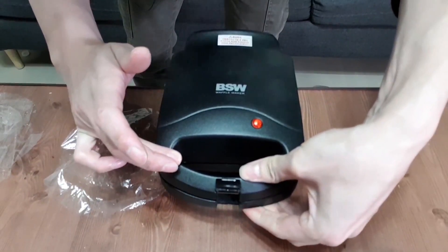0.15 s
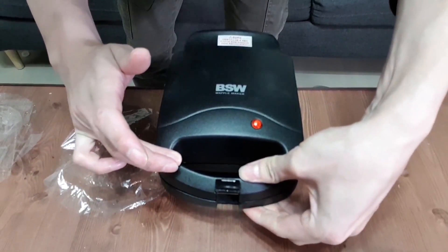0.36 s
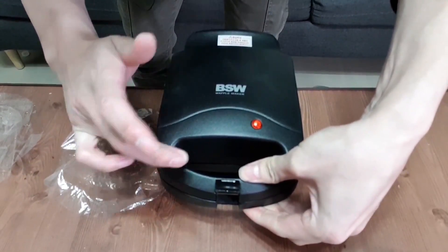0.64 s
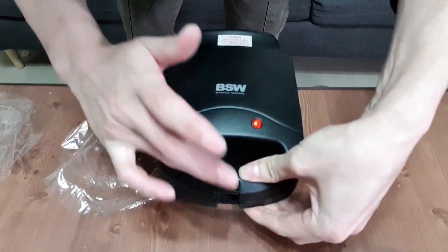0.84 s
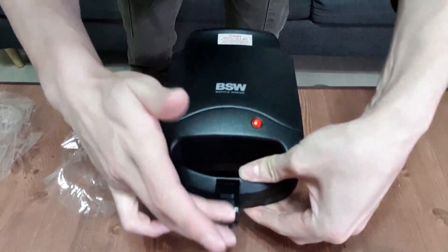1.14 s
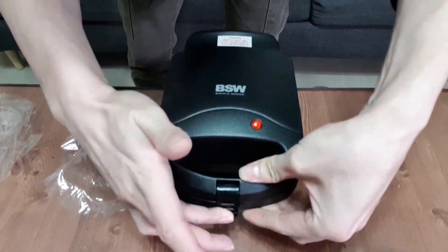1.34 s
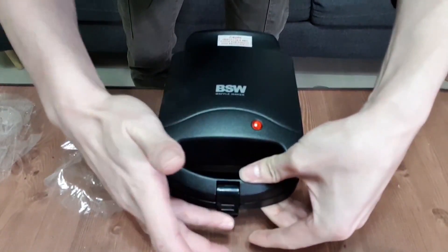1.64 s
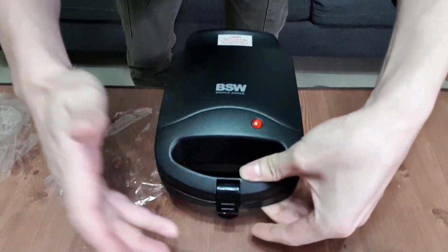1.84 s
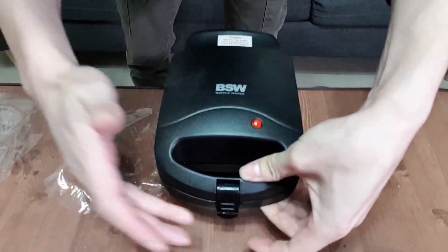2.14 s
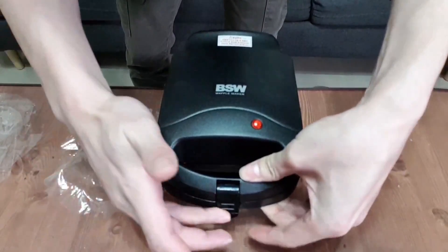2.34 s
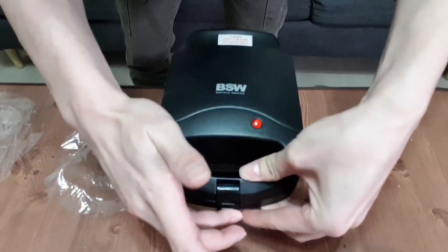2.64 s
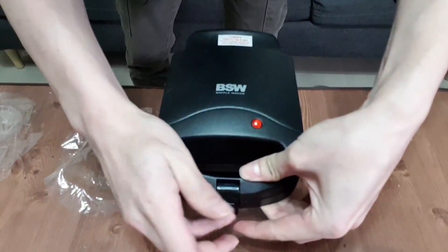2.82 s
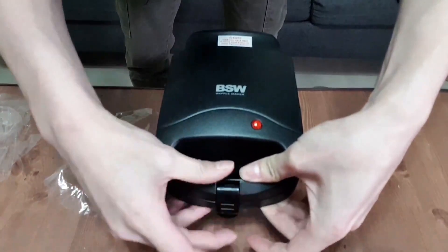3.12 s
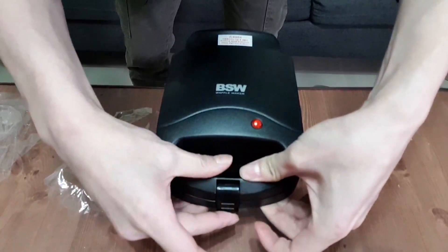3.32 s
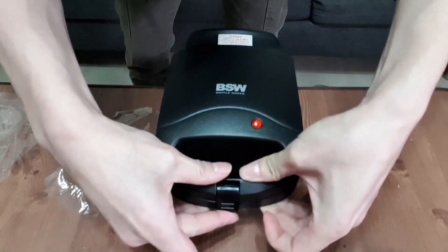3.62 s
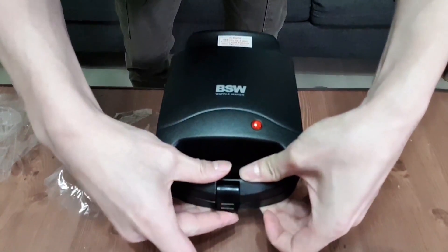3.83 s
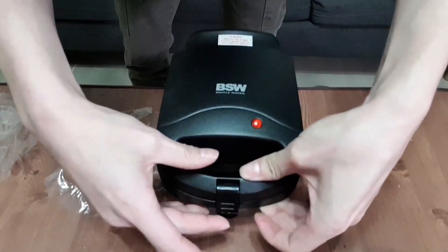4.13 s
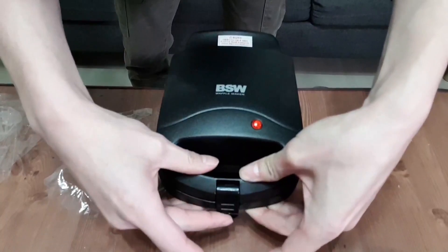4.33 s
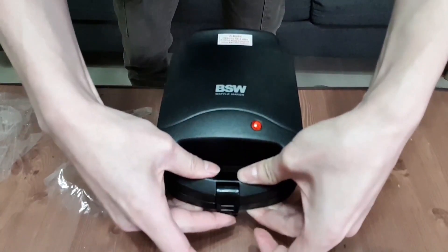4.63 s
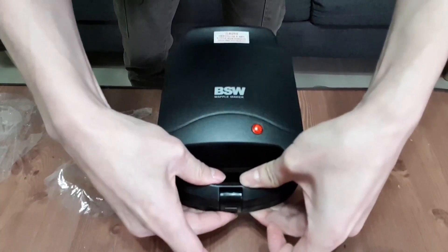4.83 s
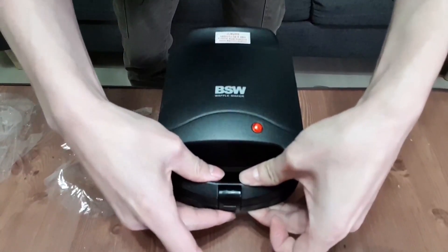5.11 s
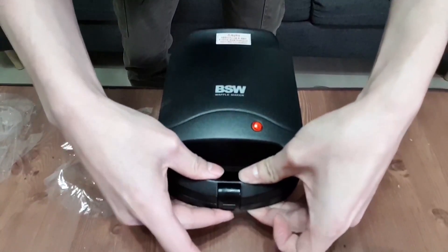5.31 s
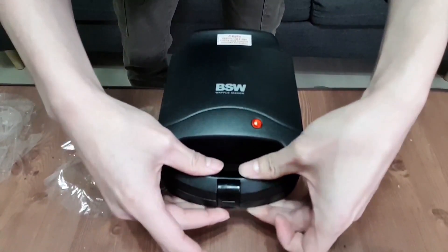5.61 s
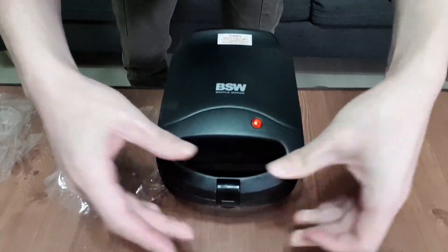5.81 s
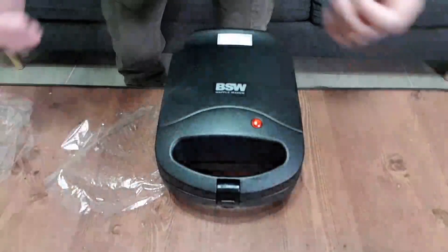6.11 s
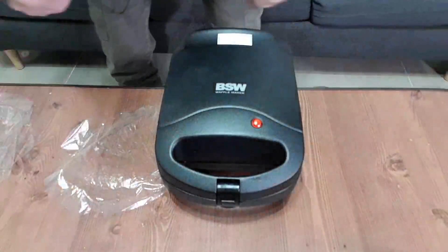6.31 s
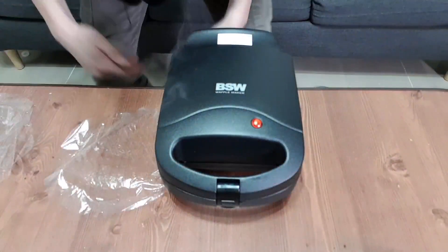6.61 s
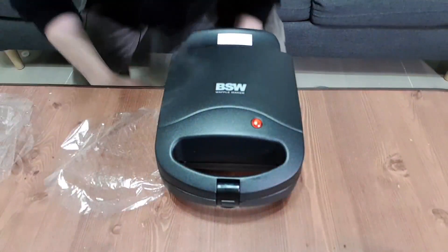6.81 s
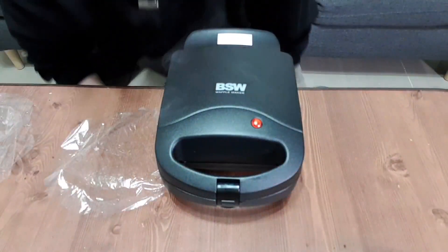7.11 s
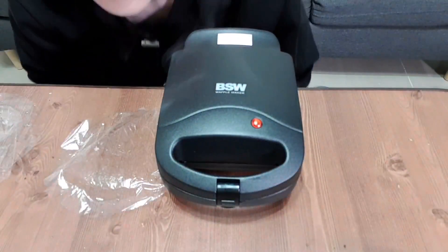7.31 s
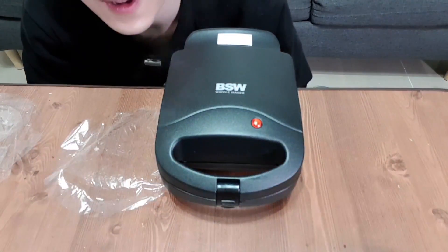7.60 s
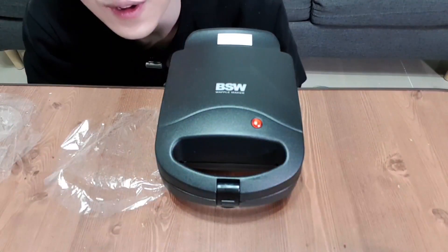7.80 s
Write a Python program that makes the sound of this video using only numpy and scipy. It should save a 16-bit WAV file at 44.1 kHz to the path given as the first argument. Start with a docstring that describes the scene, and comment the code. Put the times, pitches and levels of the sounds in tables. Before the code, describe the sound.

Fat fries under a waffle maker's lid, hissing and spitting, while hands knock the plastic case and click its latch open and shut.

```python
"""Meat and cheese fry in a closed electric waffle maker on a wooden table in a small room.
From the start fat simmers under the lid, steam hisses through the seam and droplets crackle, while a
jet sinks in pitch and dies within a second. Squeals and spits come and go. The latch flicks open,
then hands bump the plastic case and press the lid down twice, briefly choking the sizzle. The latch
snaps shut near 4.8 s, and the frying goes on with a run of short squeals."""
import sys
import numpy as np
from scipy import signal
from scipy.io import wavfile

SR = 44100
rng = np.random.default_rng(int(sys.argv[2]) if len(sys.argv) > 2 else 0)


def bounce(signal):
    """Save signal as a 16-bit WAV file at the path given by the first command-line argument."""
    frames = np.transpose(np.atleast_2d(signal))
    limited = np.clip(frames, -1, 1)
    pcm = np.round(limited * 32767).astype(np.int16)
    wavfile.write(sys.argv[1], SR, pcm)


N = 350595
TIME = np.arange(N) / SR


def from_db(db):
    """Decibels to gain."""
    return 10 ** (np.asarray(db) / 20)


def rms_one(x):
    """Scale to rms 1."""
    return x / np.sqrt(np.mean(x ** 2) + 1e-20)


def in_time(rows):
    """Each column of a timed curve at every sample."""
    times, *columns = np.transpose(rows)
    return [np.interp(TIME, times, column) for column in columns]


def at_hz(points, hz):
    """Read a spectrum on a log-frequency axis."""
    freqs, levels = np.transpose(points)
    return np.interp(np.log(hz), np.log(freqs), levels)


def add(out, start_s, sound):
    """Mix a sound in at a time."""
    at = int(np.clip(round(start_s * SR), 0, N - 1))
    out[..., at:at + sound.shape[-1]] += sound[..., :N - at]


def butter(x, kind, hz, order=2):
    """Low, high or band pass."""
    return signal.sosfilt(signal.butter(order, hz, kind, fs=SR, output="sos"), x)


def drift(rate):
    """Slow random wander of spread 1."""
    r = np.exp(-80 * np.pi * rate / SR)
    slow = signal.lfilter([1], [1, -2 * r, r * r], rng.standard_normal(N // 40 + 2002))[2000:]
    return np.interp(np.arange(N) / 40, np.arange(len(slow)), rms_one(slow))


def resonate(x, hz, width_hz):
    """A resonance with gain 1 at its peak."""
    r, w = np.exp(-np.pi * width_hz / SR), 2 * np.pi * hz / SR
    return signal.lfilter(np.array([1, 0, -1]) * (1 - r * r) / 2, [1, -2 * r * np.cos(w), r * r], x)


def cavity(x, modes):
    """Parallel resonances of alternating sign; rms 1."""
    return rms_one(sum((-1) ** k * from_db(db) * resonate(x, hz, width)
                       for k, (hz, width, db) in enumerate(modes)))


def stereo(mid, side, hz):
    """Left and right, close to mono except in the treble."""
    # Stereo width. Each row: frequency in Hz, side against mid in dB.
    width = [(30, -13), (120, -24), (700, -27), (1400, -42), (2800, -14.5), (5600, -14), (10000, -13.5),
             (15000, -3)]
    return mid + from_db(at_hz(width, hz)) * side * np.array([[1], [-1]])


def white():
    """White noise."""
    return rng.standard_normal(N)


def bursts(per_s, spread_db):
    """Bubbles bursting at random: many small, a few large; rms 1."""
    sizes = from_db(spread_db * np.minimum(rng.exponential(1, N), 5)) * rng.choice([-1, 1], N)
    return rms_one(sizes * (rng.random(N) < per_s / SR))


def coloured(source, spectrum, flicker_db, flicker_rate):
    """Noise shaped in third-octave bands; neighbours share part of their flicker; rms 1."""
    low_hz, high_hz = spectrum[0][0], min(spectrum[-1][0] * 1.1, 17000)
    edges = 20 * 2 ** (np.arange(31) / 3)
    feeds, sides = [source(), source()], rng.standard_normal((2, N))
    out, below = 0, drift(flicker_rate)
    for k, (low, high) in enumerate(zip(edges, edges[1:])):
        if high < low_hz or low > high_hz:
            continue
        hz, own = np.sqrt(low * high), drift(flicker_rate)
        gain = from_db(at_hz(spectrum, hz) + flicker_db * (own + below) / np.sqrt(2))
        mid, side = butter([feeds[k % 2], sides[k % 2]], "band", [low, high])
        out = out + gain * stereo(mid, side, hz)
        below = own
    return rms_one(out)


def steam_flow():
    """The flow in dB that drives the sizzle: it sinks under a pressed lid and rushes back on release."""
    # Steam from the food. Each row: time in seconds, dB above the usual flow.
    flow = [(0.0, 8.5), (0.13, 10.5), (0.49, 9), (1.03, 1.5), (1.49, 2.2), (1.67, 0), (2.73, 1.4),
            (3.03, 0.0), (4.73, 2.5), (5.25, -3.5), (5.37, -2.5), (5.85, -4.5), (6.15, -1), (6.27, -3),
            (6.75, -2), (7.05, 0.1), (7.11, -2.1), (7.95, 0.1)]
    # Lid presses. Each row: start and end in seconds, depth in dB, closing time in seconds.
    presses = [(1.75, 2.03, 8.5, 0.24), (3.91, 4.301, 10.5, 0.13)]
    reopen_s = 0.066
    db, = in_time(flow)
    for start, end, depth_db, closing_s in presses:
        closing = np.clip((TIME - start) / closing_s, 0, 1)
        held = np.clip(1 - (TIME - end) / reopen_s, 0, 1)
        db = db - depth_db * closing * held
    return db


def simmer(flow_db):
    """Bubbling fat rings the hollow under the lid; it cannot keep up with a strong flow."""
    # Resonances of the hollow. Each row: centre in Hz, width in Hz, level in dB.
    hollow = [(281.7, 26, -5.5), (488, 29, -8.5), (668, 36.7, 4.5), (865, 72, -0.5), (961, 30, -3),
              (1042, 57, -2), (1208, 88, -2), (1463, 160, -10), (1813, 120, -6)]
    mid, side = [cavity(bursts(per_s=4000, spread_db=1.5), hollow) for _ in range(2)]
    level_db = -46 + 0.99 * np.minimum(flow_db, 5) + 1.1 * drift(14)
    return from_db(level_db) * stereo(mid, side, 1400)


def table_bounce(x, delay_s, db):
    """One hard reflection off the table combs the spectrum; the level stays."""
    late = np.array([np.interp(TIME - delay_s, TIME, channel, left=0) for channel in x])
    return (x + from_db(db) * late) / np.sqrt(1 + from_db(2 * db))


def steam(flow_db, spurt):
    """Steam hisses out between the plates and rings the seam."""
    # Colour of the hiss. Each row: frequency in Hz, level in dB per Hz.
    hiss_colour = [(300, -15), (900, -7.5), (1400, -2), (1950, -4), (2500, 6.5), (3300, 3.5), (4100, 5),
                   (4900, -3.5), (5700, -6.5), (6800, -15), (8000, -13.5), (11000, -27)]
    # Resonances of the seam. Each row: centre in Hz, width in Hz, level in dB.
    seam_modes = [(2182, 70, -1), (2453, 85, 5), (2665, 59, 2), (2920, 69, 1.5), (3395, 92, 3),
                  (3554, 45, -1.5), (3880, 45, 7), (4194, 26, 8), (4350, 80, -4), (4710, 68, 0),
                  (4800, 44, -6)]
    hiss = coloured(lambda: bursts(per_s=12000, spread_db=3.5), hiss_colour,
                    flicker_db=2.43, flicker_rate=15.3)
    seam = cavity(bursts(per_s=5000, spread_db=1), seam_modes)
    gain = from_db(-42 + 0.87 * flow_db + 0.5 * spurt)
    return table_bounce(gain * (from_db(-1.92) * hiss + from_db(-6) * seam), delay_s=0.0019, db=-23)


def droplets():
    """Droplets crackle, their colour shifting twice as the frying goes on; the finest come in flurries."""
    # Resonances of each colour of the crackle. Each row: centre in Hz, width in Hz, level in dB.
    first_tint = [(5100, 950, -2.5), (6200, 950, -2), (7360, 940, -0.5), (8320, 500, -1.5), (10480, 550, -4),
                  (11700, 340, -10), (13800, 600, -40)]
    second_tint = [(6560, 980, 3.5), (7500, 1280, 4), (9800, 2600, -2), (11460, 650, 2), (13200, 920, -1),
                   (15400, 700, -8)]
    third_tint = [(5140, 380, 9.5), (6330, 210, 5.5), (6660, 290, 2), (9800, 260, -12), (10900, 1000, -39),
                  (12500, 680, -13), (14100, 1900, -2)]
    # Colour of the crackle over time. Each row: time in seconds, then each colour's share from 0 to 1.
    tint_shares = [(.55, 1, 0.9, 0.01), (.8, 0.17, 1, 0.15), (5.8, 0.12, 0.82, 0.2), (6.05, 0.9, 0.8, 1)]
    # Colour of spray in open air. Each row: frequency in Hz, level in dB per Hz.
    spray_colour = [(2000, -34), (4500, -14), (6200, -12), (7700, -16), (9200, 6.5), (10600, -7),
                    (12000, 1), (13600, 4), (15500, -9)]
    tinted = 0
    for share, modes in zip(in_time(tint_shares), (first_tint, second_tint, third_tint)):
        mid, side = [cavity(bursts(per_s=11000, spread_db=3.5), modes) for _ in range(2)]
        tinted = tinted + np.sqrt(share) * stereo(mid, from_db(5.5) * side, 9400)
    open_air = coloured(lambda: bursts(per_s=6000, spread_db=5), spray_colour,
                        flicker_db=7.5, flicker_rate=21)
    wide = stereo(open_air[0], from_db(20) * open_air[1], 10400)
    mid, side = [cavity(bursts(per_s=1900, spread_db=6), [(12600, 7900, 0)]) for _ in range(2)]
    flurry = from_db(-12.5 + 4.2 * drift(38)) * butter(stereo(mid, side, 12500), "high", 7400)
    return from_db(0.5) * butter(tinted, "high", 4100) + from_db(-13) * wide + flurry


def spray(flow_db, spurt):
    """Coarse droplets spurt with the steam; the fine mist spurts on its own."""
    crackle, split_hz = droplets(), 8800
    coarse = from_db(-50.5 + 0.84 * flow_db + 2.2 * spurt) * butter(crackle, "low", split_hz, order=3)
    mist = from_db(-51.5 + 1.4 * flow_db + 2 * drift(21)) * butter(crackle, "high", split_hz, order=3)
    return table_bounce(coarse + mist, delay_s=0.0029, db=-10)


def breathy_tone(hz, width_hz):
    """Turbulence in a narrow resonance that follows a pitch track; rms 1."""
    a, b = butter(rng.standard_normal((2, len(hz))), "low", width_hz / 2)
    phase = 2 * np.pi * np.cumsum(hz) / SR
    return rms_one(a * np.cos(phase) + b * np.sin(phase))


def jet():
    """A wide steam jet: its note sinks, breaks and dies inside a soft rush."""
    # The jet's note. Each row: time in seconds, pitch in Hz, level in dB.
    note = [(0, 1457, -34), (.05, 1370, -46), (.09, 1210, -34.5), (.18, 1166, -36), (.4, 1100, -40.5),
            (.435, 847, -45), (.48, 810, -38), (.62, 785, -42.5), (1.0, 707, -77)]
    hz, db = in_time(note)
    rush = butter(breathy_tone(1.1 * hz, width_hz=620), "high", 700)
    return from_db(db) * (breathy_tone(hz, width_hz=115) + from_db(-6) * rush)


def squeals():
    """Steam squeezes through melted cheese, gliding as the opening changes; wider glides rasp more."""
    # Squeals. Each row: start and length in seconds, first and last pitch in Hz, level in dB.
    glides = [(.04, 0.11, 3550, 3610, -42), (0.219, 0.19, 3435, 3435, -36), (1.451, 0.072, 3600, 4000, -41),
              (1.702, 0.046, 3930, 3730, -46), (2.63, .46, 3380, 3260, -46.5),
              (4.363, 0.19, 3920, 3830, -37.5), (4.68, 0.13, 3760, 3920, -41),
              (6.059, 0.056, 3260, 3890, -45), (6.149, .05, 3400, 2920, -40.5),
              (6.624, 0.039, 2420, 3270, -47), (6.818, 0.06, 2360, 2880, -44.5),
              (6.929, 0.013, 2330, 2550, -43), (7.028, .06, 3900, 3330, -42.5),
              (7.169, 0.019, 2520, 2690, -44), (7.219, 0.035, 3400, 3650, -42),
              (7.421, 0.066, 2795, 3640, -43), (7.613, 0.029, 2670, 3000, -45),
              (7.686, 0.12, 2320, 3800, -37.5)]
    out = np.zeros((2, N))
    for start, length, first_hz, last_hz, db in glides:
        hz = np.geomspace(first_hz, last_hz, int(length * SR))
        swell = np.hanning(len(hz)) ** (1 / 3)
        mid, side = [breathy_tone(hz, width_hz=250 + 0.19 * abs(last_hz - first_hz)) for _ in range(2)]
        add(out, start, from_db(db) * swell * stereo(mid, side, first_hz))
    return out


def lesser_spits(flow_db, per_s=21, low_hz=3000, high_hz=15200, width_hz=850):
    """Small narrow spits at random times and pitches, louder in a strong flow."""
    rows = []
    for when, size, length, pitch in rng.random((400, 4))[:int(per_s * N / SR)]:
        db = -50.5 + flow_db[int(when * N)] + 2 * (2 * size - 1)
        hz = low_hz + pitch * (high_hz - low_hz)
        rows.append((when * N / SR, db, 0.017 * (0.5 + length), hz, width_hz))
    return rows


def spits(flow_db, attack_s=0.003):
    """A pocket of moisture bursts and hisses away; the higher a loud spit, the broader its hiss."""
    # The loudest spits of fat. Each row: start in seconds, level in dB, decay in seconds, pitch in Hz.
    loud_spits = [(0.753, -35, .012, 2640), (0.831, -37, .025, 12000), (0.914, -36, 0.028, 12000),
                  (1.328, -28, .005, 3900), (2.5, -37, 0.012, 13500), (3.532, -43, 0.084, 12000),
                  (3.775, -41, 0.05, 12000), (4.96, -43, 0.034, 13000), (5.326, -43, .025, 12700),
                  (5.54, -40, 0.01, 11500), (5.652, -38, 0.015, 3000), (6.091, -39.5, 0.021, 12000),
                  (6.138, -38, 0.049, 4100), (6.336, -34.5, 0.027, 3760), (6.789, -34, .012, 3900),
                  (7.655, -37, .01, 4300)]
    out, t = np.zeros((2, N)), TIME[:SR // 5]
    noise = rng.standard_normal((2, N + len(t)))
    loud = [(start, db, decay_s, hz, 800 * (hz / 4000) ** 2.6) for start, db, decay_s, hz in loud_spits]
    for start, db, decay_s, hz, width_hz in loud + lesser_spits(flow_db):
        at = int(start * SR)
        puff = rms_one(resonate(noise[:, at:at + len(t)], hz, width_hz))
        mid, side = butter(puff, "high", 0.44 * hz)
        envelope = (1 - np.exp(-t / attack_s)) * np.exp(-t / decay_s)
        add(out, start, from_db(db) * envelope * stereo(mid, side, hz))
    return out


def room_tone():
    """The quiet room: a low, gently flickering bed of noise."""
    # Colour of the room tone. Each row: frequency in Hz, level in dB per Hz.
    room_colour = [(25, -10.5), (55, -6.5), (100, -4), (170, -9), (280, -4), (500, -3), (1500, -8)]
    return from_db(-58.5) * coloured(white, room_colour, flicker_db=2, flicker_rate=8.2)


def blows(times, levels_db, contact_s, rebound_db, rebound_s, softening):
    """Force of each knock: a push and a weaker rebound; softening lengthens the gentler touches."""
    force, t = np.zeros(N), TIME[:SR // 50]
    for start, db in zip(times, levels_db):
        push = t * np.exp(-t / (contact_s * from_db(softening * (max(levels_db) - db))))
        add(force, start, from_db(db) * push / push.sum())
        add(force, start + rebound_s, from_db(db + rebound_db) * push / push.sum())
    return force


def ring(force, modes):
    """Struck modes: a blow starts a dying sine in each."""
    out = 0
    for hz, db, t60 in modes:
        r, w = from_db(-60 / (t60 * SR)), 2 * np.pi * hz / SR
        mode = signal.lfilter([0, np.sin(w)], [1, -2 * r * np.cos(w), r * r], force + 1e-18)
        out = out + from_db(db) * mode
    return out


def knocks():
    """Each knock shakes the appliance on the table, rings shell and latch, and clicks loose plastic."""
    # The latch flicks open, rattles and snaps shut.
    # Each row: start in seconds, then thump, clack, click and latch ring in dB.
    snaps = [(1.2723, -37, -14, -8, -57), (1.3098, -34, -12.5, -3, -42), (1.3127, -42, -23, -19, -37),
             (2.293, -42, -23.5, -11, -38), (4.783, -31, -19, -12, -40), (4.7961, -21.5, -19, -5.5, -7.5)]
    # Hands bump the case. Each row: start in seconds, thump in dB, shell clack in dB.
    bumps = [(1.766, -27, -18.5), (1.988, -41, -50), (2.623, -34.5, -38), (2.67, -47, -54),
             (3.527, -26.5, -27), (3.65, -41, -35), (3.933, -13.5, -21), (4.196, -38.5, -27),
             (4.346, -35, -51), (4.724, -31.5, -47), (5.02, -44.5, -56), (5.572, -42, -38)]
    # Modes of the appliance on the table, its plastic shell and its latch.
    # Each row: pitch in Hz, level in dB, seconds to fall 60 dB.
    body_modes = [(55, -21, 0.27), (85.8, -18, 0.33), (138, -23, 0.14), (236, -4, 0.074),
                  (274, -5.5, 0.097), (403, -47, .025)]
    shell_modes = [(692, -20.5, 0.13), (830, -3, 0.022), (1823, -14.5, 0.024), (2230, -12, 0.014),
                   (3120, -7.5, 0.0084), (4130, -11.5, 0.033), (5400, -16, 0.044), (7450, -23, .007)]
    latch_modes = [(476, -15, 0.023), (644, -20, .025), (1030, -1.5, 0.017), (1253, -21, 0.1),
                   (1434, -10.5, 0.029), (1910, -14.5, 0.015), (3400, -5.5, 0.01)]
    # Colour of a plastic click. Each row: frequency in Hz, level in dB per Hz.
    click_colour = [(400, -19), (1000, 18), (2700, 11), (4000, 18), (5800, 3.5), (7200, 11), (9000, -14),
                    (11500, 5.5), (15500, -24)]
    # only hard bumps tick the loose plastic, and the latch hardly stirs
    hardest = max(thump for _, thump, _ in bumps)
    hands = [(start, thump, clack, -16 - 2.6 * (hardest - thump), thump - 18)
             for start, thump, clack in bumps]
    times, thump_db, clack_db, click_db, latch_db = np.transpose(hands + snaps)
    on_body = blows(times, thump_db, contact_s=2e-4, rebound_db=-3, rebound_s=0.00744, softening=0.17)
    on_shell = blows(times, clack_db, contact_s=25e-6, rebound_db=-3.5, rebound_s=0.0058, softening=0.67)
    on_latch = blows(times, latch_db, contact_s=2e-5, rebound_db=-10.5, rebound_s=0.005, softening=0.1)
    on_plastic = blows(times, click_db, contact_s=8e-5, rebound_db=-11, rebound_s=0.0057, softening=0)
    # small parts radiate little bass
    thump = butter(ring(on_body, body_modes), "high", 55)
    clack = butter(ring(on_shell, shell_modes) + ring(on_latch, latch_modes), "high", 580)
    # the click dies within a few milliseconds
    envelope = signal.lfilter([1], [1, -np.exp(-1 / (0.0015 * SR))], on_plastic + 1e-18)
    click = envelope * coloured(white, click_colour, flicker_db=0.5, flicker_rate=3.7)
    return thump + clack + from_db(-9.5) * click


def room(x, wall_cut_hz, t60_s):
    """Echoes circle between the walls, duller on every round; wide only in the treble."""
    out, dull = np.zeros((2, N)), np.exp(-2 * np.pi * wall_cut_hz / SR)
    for k, lag in enumerate((rng.uniform(0.011, 0.04, 18) * SR).astype(int)):
        loop, state = x.copy(), [0.0]
        gain = from_db(-60 * lag / SR / t60_s)
        for i in range(lag, N, lag):
            back, state = signal.lfilter([gain * (1 - dull)], [1, -dull], loop[i - lag:i], zi=state)
            loop[i:i + lag] += back[:N - i]
        out[k % 2] += (loop - x) * (-1) ** (k // 2)
    for lag in (67, 151, 233):  # allpasses smear each echo
        gap = np.zeros(lag - 1)
        out = signal.lfilter(np.r_[-0.6, gap, 1], np.r_[1, gap, -0.6], out)
    return stereo(out[0], butter(out[1], "high", 1500, order=1), 8000)


def scene():
    """The waffle maker close by; its knocks leave a short room echo with little bass."""
    flow_db, handling = steam_flow(), knocks()
    send = butter(handling.mean(axis=0), "high", 255)
    echo = from_db(-15.5) * room(send, wall_cut_hz=3700, t60_s=0.3)
    air = room_tone()
    spurt = drift(7.3)
    sizzle = simmer(flow_db) + steam(flow_db, spurt) + spray(flow_db, spurt)
    return sizzle + jet() + squeals() + spits(flow_db) + air + handling + echo


def record(dry, cutoff_hz=15700):
    """A steep low pass trims the very top."""
    return signal.sosfilt(signal.ellip(12, 0.1, 80, cutoff_hz, fs=SR, output="sos"), dry)


dry = scene()
out = record(dry)
bounce(out)
```